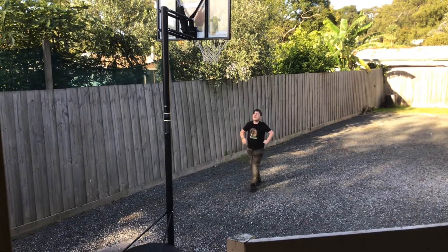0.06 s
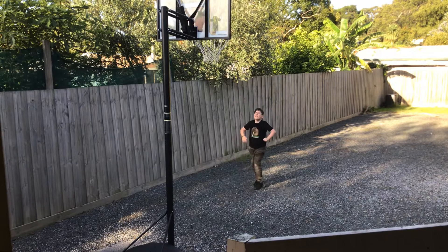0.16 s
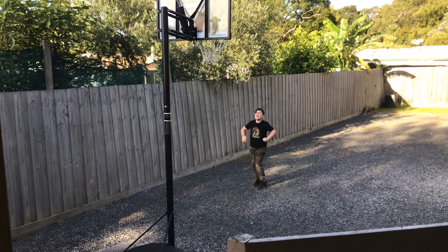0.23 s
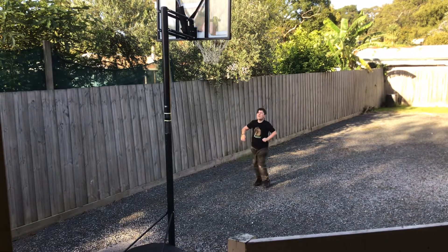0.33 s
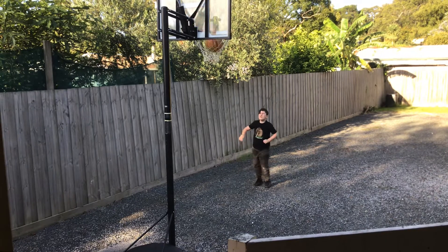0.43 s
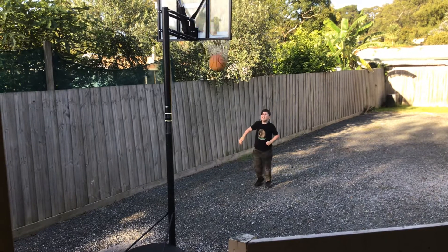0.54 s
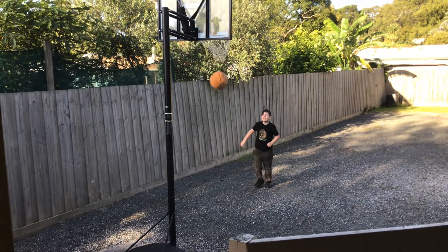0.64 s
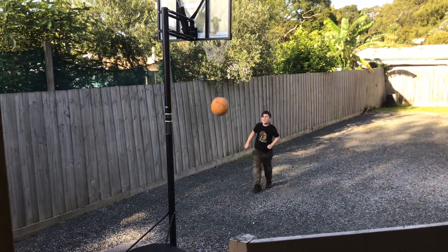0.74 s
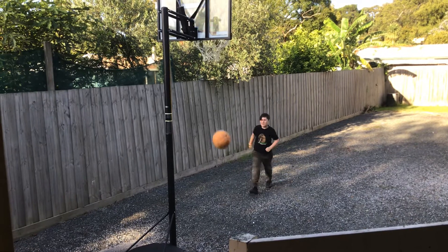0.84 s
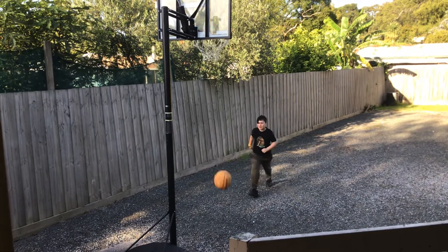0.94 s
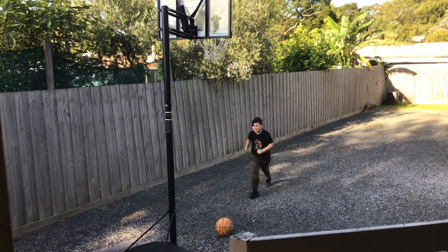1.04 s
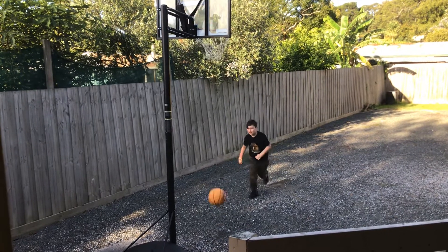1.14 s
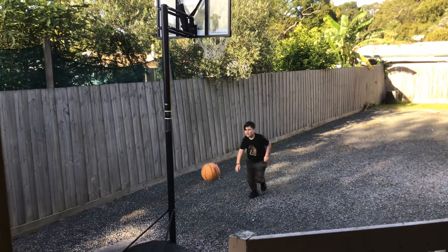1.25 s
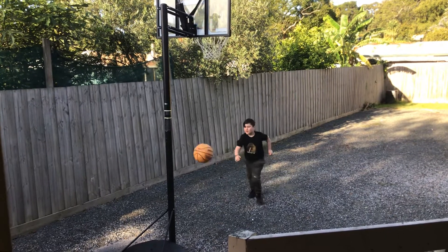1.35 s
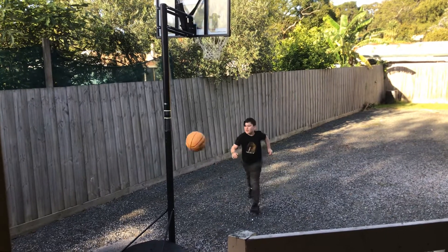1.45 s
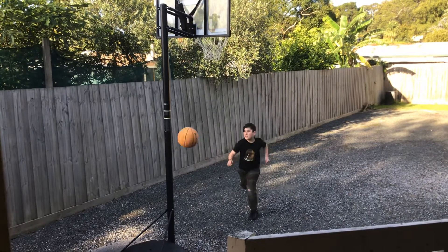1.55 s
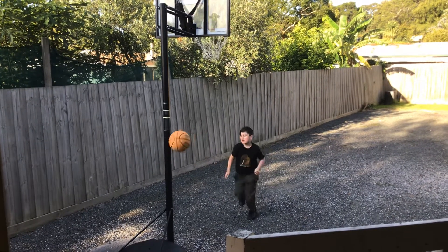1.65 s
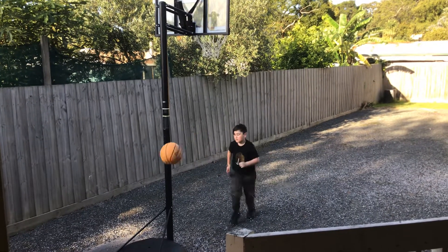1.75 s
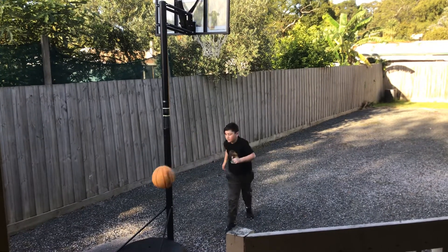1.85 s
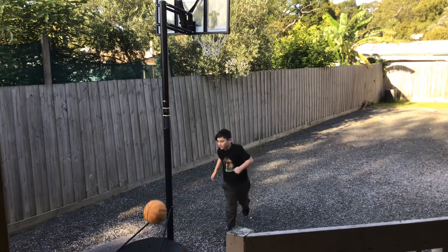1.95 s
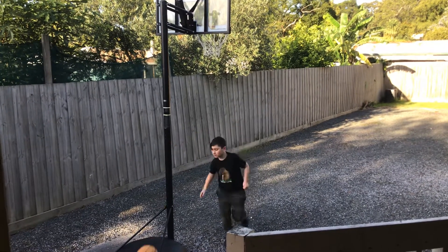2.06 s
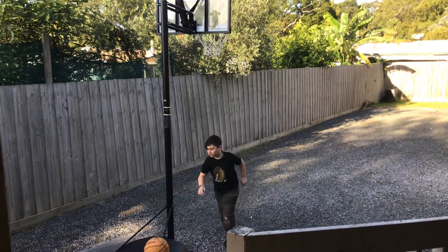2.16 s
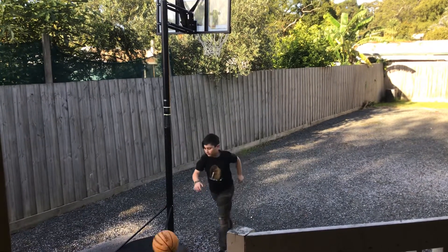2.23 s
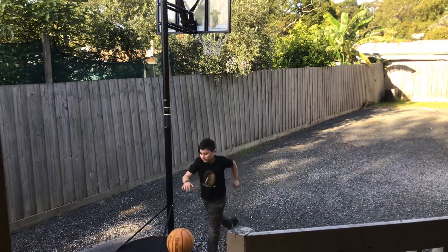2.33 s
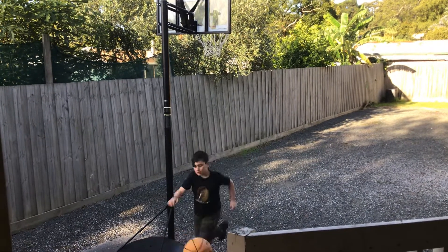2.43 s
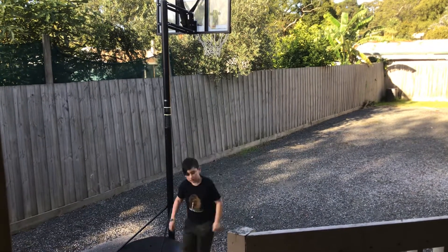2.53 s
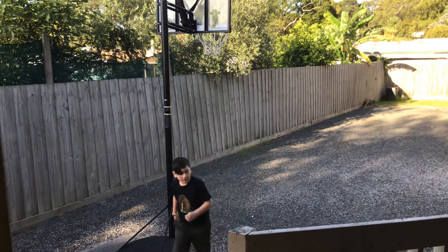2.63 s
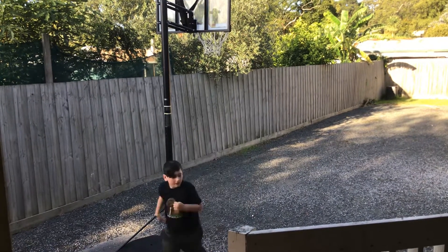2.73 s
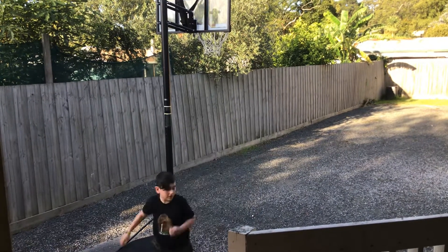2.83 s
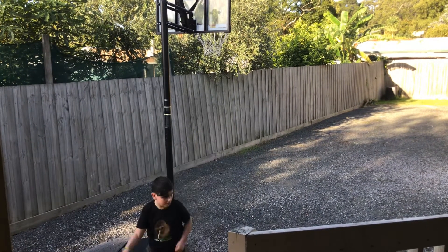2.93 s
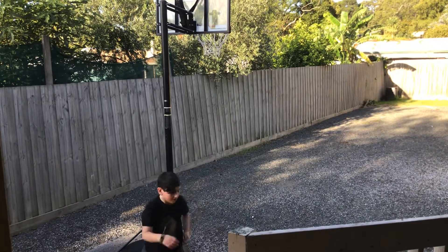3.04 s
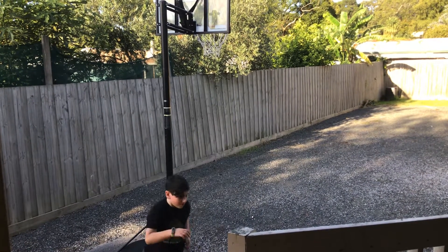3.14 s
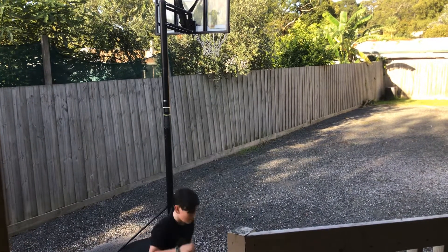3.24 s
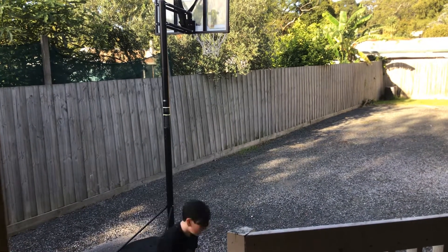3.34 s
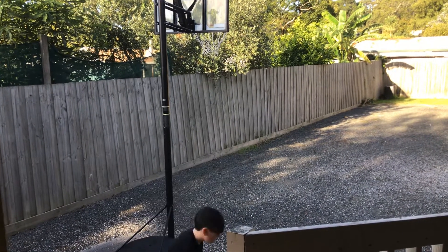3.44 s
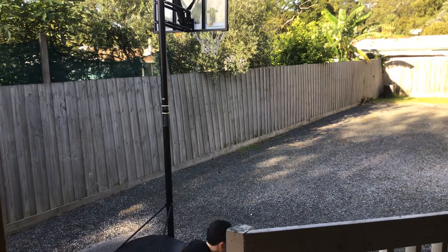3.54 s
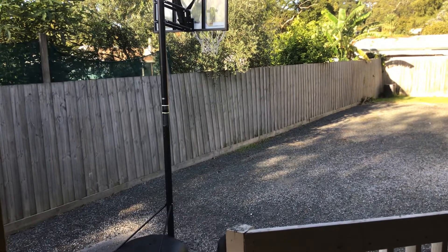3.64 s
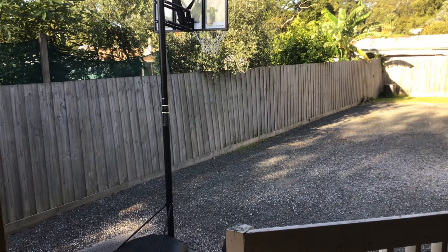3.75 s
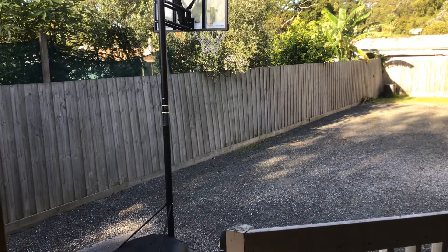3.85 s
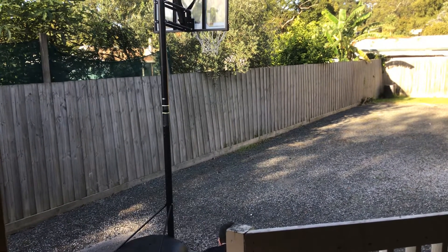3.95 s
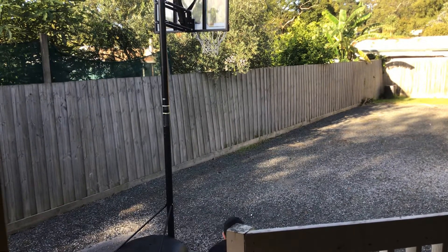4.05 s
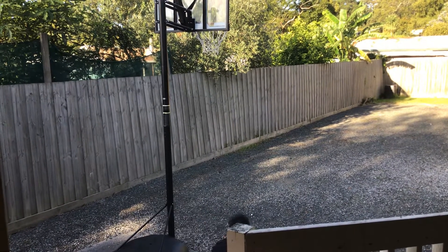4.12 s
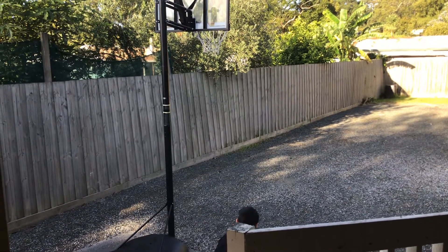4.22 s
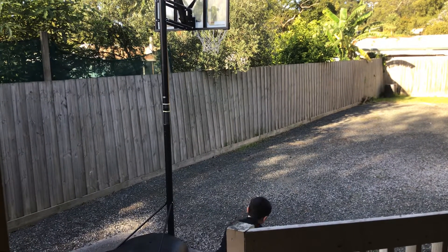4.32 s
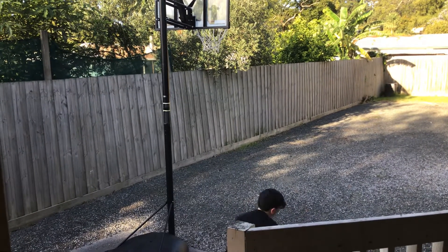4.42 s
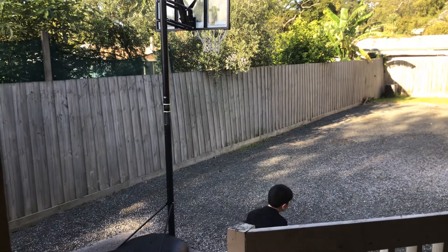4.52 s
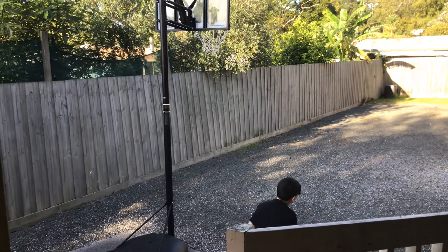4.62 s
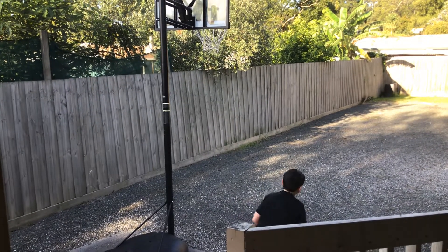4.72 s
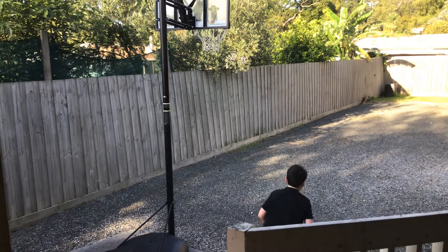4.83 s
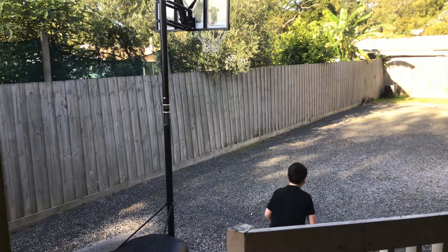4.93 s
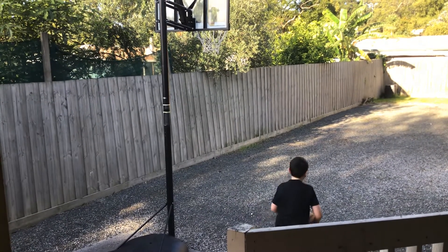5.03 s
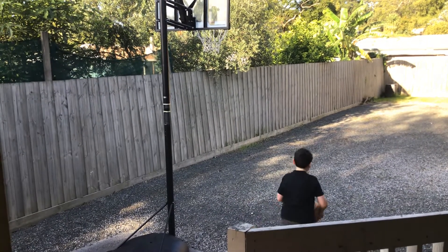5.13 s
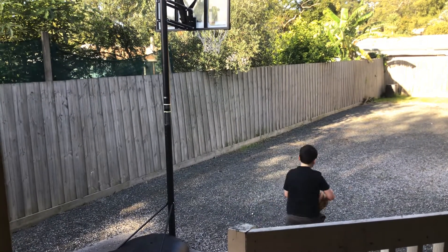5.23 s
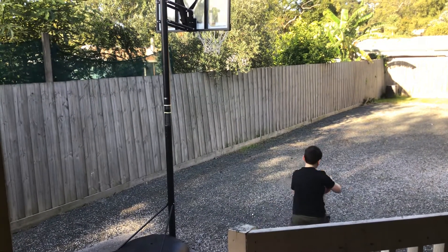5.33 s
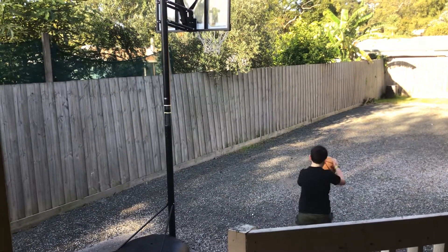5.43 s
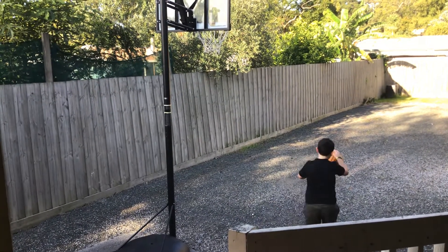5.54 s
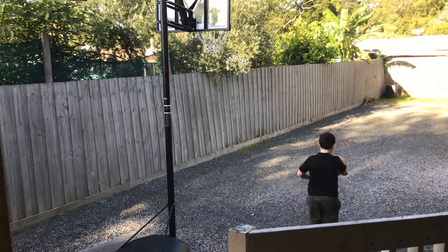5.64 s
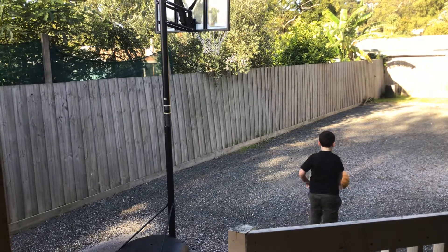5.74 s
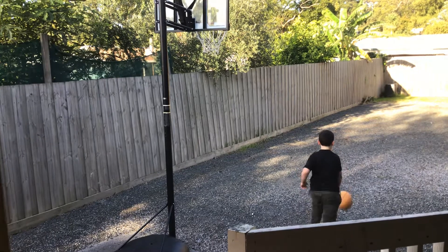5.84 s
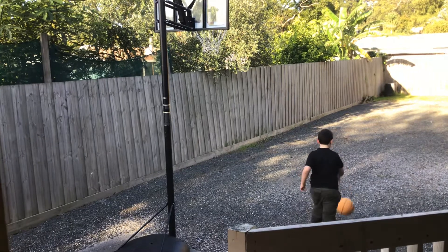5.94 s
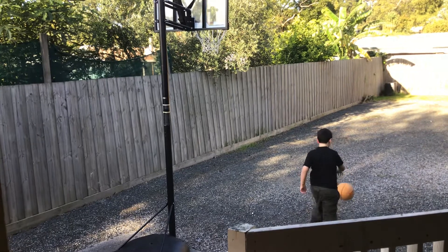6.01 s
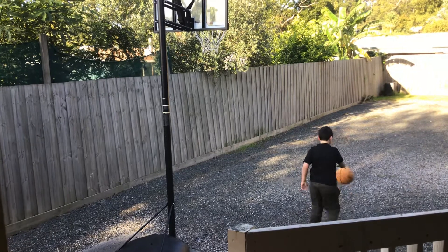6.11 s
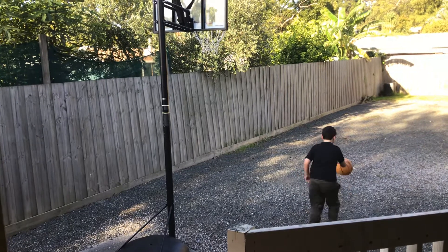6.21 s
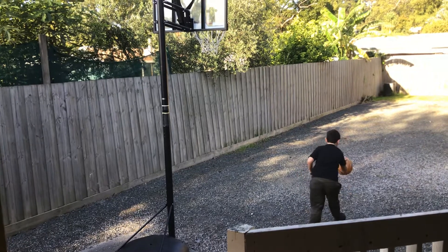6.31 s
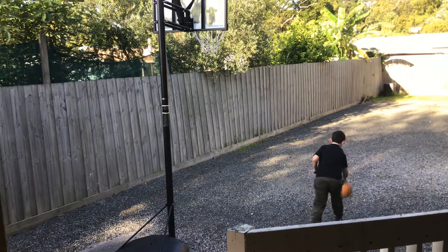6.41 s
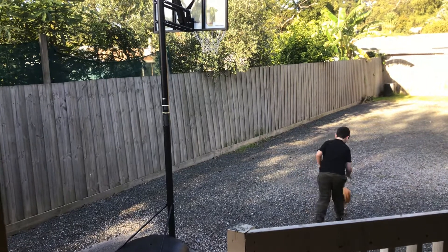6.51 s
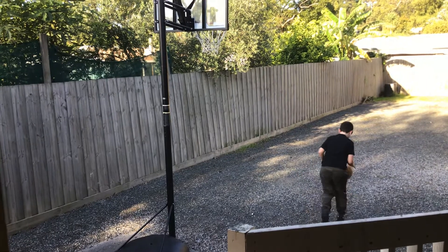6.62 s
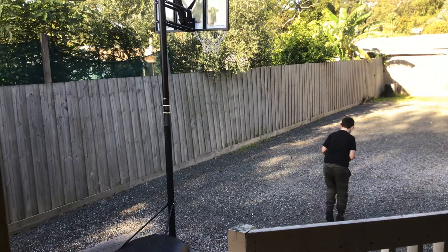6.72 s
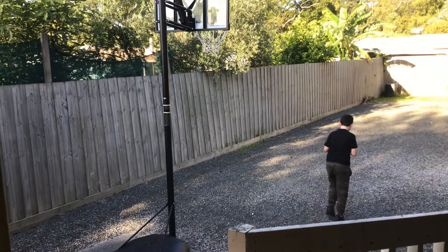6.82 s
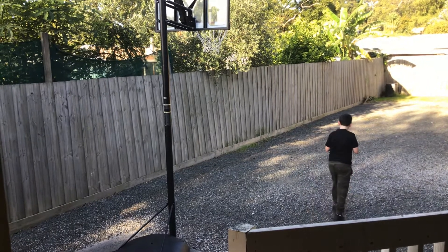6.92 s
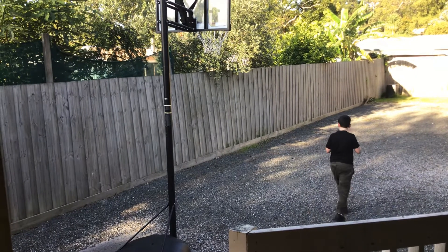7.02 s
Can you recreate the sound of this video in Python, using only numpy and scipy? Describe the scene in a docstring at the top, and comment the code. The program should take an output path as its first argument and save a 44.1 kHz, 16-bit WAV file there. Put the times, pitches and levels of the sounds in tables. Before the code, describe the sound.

A basketball hoop shudders and clanks as the ball swishes softly through the net. The ball lands on packed gravel with a loud, slapping thud and keeps bouncing, mixed with hollow knocks on a wooden step. Shoes crunch over the stones, then come two dribbles and a brief small rattle. The bounces echo lightly around a yard with a faint hush of distant traffic and leaves.

```python
"""A yard hoop shudders and its net swishes, then a basketball drops and bounces on packed gravel.
Each bounce is a slap and a thump, with the rubber and the air inside ringing. The ball knocks about a
wooden step and is dribbled away, while shoes crunch the stones and something small rattles at the end.
Fence and house echo each thud over a suburban hush of far traffic and leaves."""
import sys
import numpy as np
from scipy import signal
from scipy.fft import rfft, irfft, next_fast_len
from scipy.io import wavfile
from scipy.ndimage import uniform_filter1d

SR = 44100
rng = np.random.default_rng(int(sys.argv[2]) if len(sys.argv) > 2 else 0)


def generate_wav(sig):
    """Save sig (samples, or channels by samples) to the path in sys.argv[1] as 16-bit PCM at SR."""
    pcm = np.round(np.clip(np.atleast_2d(sig).T, -1, 1) * 32767).astype(np.int16)
    wavfile.write(sys.argv[1], SR, pcm)


N = 311787
T = np.arange(N) / SR


def undb(db):
    """Turns decibels into a gain."""
    return 10 ** (np.asarray(db) / 20)


def unit(x):
    """Scales x to an average (RMS) level of 1."""
    return x / np.sqrt(np.mean(x ** 2))


def peak(x, db):
    """Scales x so that its highest point is at db."""
    return undb(db) * x / np.max(np.abs(x))


def band(x, lo_hz, hi_hz):
    """Keeps the sound between two pitches."""
    edges = np.clip([lo_hz, hi_hz], 10, SR / 2.2)
    return signal.sosfilt(signal.butter(2, edges, "band", fs=SR, output="sos"), x)


def colour(x, points):
    """Shapes the tone of x along a curve of (Hz, dB) points."""
    size = next_fast_len(len(x))
    hz, db = np.transpose(points)
    f = np.maximum(np.arange(size // 2 + 1) * SR / size, 1)
    gain = undb(np.interp(np.log(f), np.log(hz), db))
    return irfft(rfft(x, size) * gain, size)[:len(x)]


def fade(t, t60):
    """Dies away by 60 dB in t60 seconds, the fade time."""
    return np.exp(-np.log(1000) * t / max(t60, .002))


def swell(start_s, rise_s, hold_s, t60):
    """A level that rises, holds and fades."""
    age = T - start_s
    return np.clip(age / max(rise_s, .001), 0, 1) * fade(np.maximum(age - rise_s - hold_s, 0), t60)


def ring(t, tones, scatter_db, tilt_db=0):
    """A struck object's fading tones; their levels and pitches vary a little with every blow."""
    chance = rng.standard_normal((len(tones), 2))
    return sum(undb(db + scatter_db * louder + tilt_db * np.log2(hz / tones[0][0])) * fade(t, t60)
               * np.sin(2 * np.pi * hz * (1 + 0.022 * sharper) * t)
               for (hz, db, t60), (louder, sharper) in zip(tones, chance))


def add(out, s, sound):
    """Mixes a sound into out, starting at s seconds."""
    i = int(s * SR)
    out[i:i + len(sound)] += sound[:N - i]


def walk(per_s):
    """Glides smoothly to a new random value per_s times a second."""
    hold = int(SR / per_s)
    steps = np.repeat(rng.standard_normal(N // hold + 1), hold)
    return uniform_filter1d(uniform_filter1d(steps, hold), hold)[:N]


def grains(per_s, spread_db, smear_s):
    """Random clicks of different sizes, each smeared into a short puff of noise."""
    clicks = (rng.random(N) < per_s / SR) * undb(spread_db * rng.exponential(size=N))
    decay = np.exp(-1 / (max(smear_s, 1e-4) * SR))
    return signal.lfilter([1], [1, -decay], clicks) * rng.standard_normal(N)


def hush():
    """Far traffic and leaves: octaves of noise that swell together and flicker alone."""
    # Each row: pitch in Hz, relative level of the noise in dB.
    tone_curve = [(18, -79), (30, -21), (79, 2.5), (103, -9), (170, -7), (303, -14.5), (415, -16),
                  (721, -15.5), (1130, -15), (3580, -31), (5740, -43.5), (16000, -47.5)]
    size = next_fast_len(N)
    spectrum = rfft(colour(rng.standard_normal(N), tone_curve), size)
    drift_db = 1.2 * walk(0.59)
    octave = np.log2(np.maximum(np.arange(len(spectrum)) * SR / size, 1) / 31)
    layers = (irfft(spectrum * np.clip(1 - abs(octave - k), 0, 1), size)[:N] for k in range(10))
    return unit(sum(layer * undb(drift_db + 0.23 * walk(3.4)) for layer in layers)) * undb(-51)


def yard(x):
    """The yard adds a tail of scattered echoes; its highs drift between two tails as a smooth wash."""
    # Each row: pitch in Hz, build-up in seconds, fade time in seconds, gain in dB.
    echo_bands = [(117, 0.025, 0.49, -47.5), (257, 0.019, 0.83, -45), (577, 0.0085, 0.32, -36.5),
                  (1550, 0.0028, 0.43, -37.5), (2930, 0.016, 0.74, -45.5), (7100, 0.006, 0.53, -39.5)]
    drift_above_hz = 420
    t = T[:int(.7 * SR)]

    def tail(rows):
        response = sum(undb(db) * band(rng.standard_normal(len(t)), hz / 1.74, hz * 1.69)
                       * fade(t, t60) * np.minimum(t / build_s, 1) ** 2 for hz, build_s, t60, db in rows)
        return signal.fftconvolve(x, response)[:N]
    low = [row for row in echo_bands if row[0] < drift_above_hz]
    high = [row for row in echo_bands if row[0] >= drift_above_hz]
    blend = 2 * np.pi * 1.218 * walk(70)
    return x + tail(low) + np.cos(blend) * tail(high) + np.sin(blend) * tail(high)


def chips():
    """Stray chips of gravel skip about with faint ticks."""
    return undb(-63.5) * band(grains(per_s=7, spread_db=2.5, smear_s=0.0013), 3100, 12500)


def small_rattle():
    """Something small and hard rattles: bursts of contact make it ring."""
    # Each row: start in seconds, peak level in dB.
    shakes = [(6.831, -39), (6.8856, -45), (6.927, -35.5), (6.9483, -42.5), (6.9788, -35), (7.0506, -41)]
    # Each row: pitch in Hz, relative level in dB, fade time in seconds.
    tones = [(1530, 3, 0.013), (1795, 1.5, 0.093), (2330, 6, 0.018), (2630, -4, 0.022), (3480, -1, .03),
             (3800, -3, 0.025), (4280, -8, 0.04)]
    out, t = np.zeros(N), T[:SR // 2]
    for s, db in shakes:
        contact = rng.standard_normal(len(t)) * fade(t, 0.14)
        ringing = signal.fftconvolve(contact, ring(t, tones, scatter_db=2.1))[:len(t)]
        add(out, s, peak(ringing, db))
    return out


def gravel(drive, hz, grit_db):
    """Pressed gravel: a crunch with a squeak in it, a low weight under it and fine grit over it."""
    crunch = unit(band(drive, hz / 1.7, hz * 1.7))
    squeak = undb(-9) * unit(band(drive, hz / 1.05, hz * 1.05))
    weight_db = 1.23 - 2.5 * np.log2(hz / 2000)  # finer stones carry less weight
    weight = undb(weight_db) * unit(band(drive, 426, 990))
    grit = undb(grit_db) * unit(band(drive, 5450, 13500))
    return crunch + squeak + weight + grit


def stone_snaps():
    """Lone stones snap underfoot, each a sudden short crunch."""
    # Each row: start in seconds, level in dB, pitch in Hz, grit in dB relative to the crunch.
    snaps = [(1.093, -33.5, 1760, -18), (1.5664, -42.5, 1510, -4), (1.7998, -34.5, 1780, -29),
             (1.9708, -50.5, 3440, -20), (2.4503, -39, 1710, -9.5), (2.8039, -46, 2970, -5),
             (2.826, -42, 2970, -16), (3.2978, -41, 1400, -25), (3.6221, -42, 1622, -4.5),
             (3.7544, -42, 1700, -2.5), (3.8122, -35, 2600, -6), (4.7147, -48.5, 3260, -9),
             (4.9519, -39, 4000, -4), (5.0195, -38, 2920, -9.5), (5.3012, -37.5, 1890, -18),
             (5.3552, -48.5, 4630, 1), (5.3762, -47.5, 5600, -2), (5.4311, -39.5, 5200, -15),
             (5.7898, -44, 3100, -28), (5.8805, -44.5, 2500, -13), (5.943, -43, 2930, -5),
             (6.3944, -40, 1440, -4)]
    out, t = np.zeros(N), T[:SR // 2]
    shape = np.minimum(t / 0.0034, 1) * fade(t, 0.063)
    for s, db, hz, grit_db in snaps:
        add(out, s, undb(db) * gravel(rng.standard_normal(len(t)), hz, grit_db) * shape)
    return out


def pebbles(hz, grit_db, length_s, per_s=150):
    """Pebbles turn and click under a sole, each with its own size and pitch; the finest sound as grit."""
    out, t = np.zeros(SR // 2), T[:SR // 20]
    for when, size, fine in rng.random((60, 3))[:int(per_s * length_s) + 1]:
        pitch = hz * 2 ** (1.124 * (3 * fine - 1))
        click = unit(band(rng.standard_normal(len(t)), pitch / 1.15, pitch * 1.15)) * fade(t, 0.028)
        size_db = -0.5 - 2.5 * np.log(1 - size)
        fine_db = np.interp(np.log(pitch), np.log([hz, 9000]), [0, grit_db])
        add(out, when * length_s, undb(size_db + fine_db) * click)
    return out


def shoes():
    """Soles bite into the gravel and grind it in lurches while pebbles click."""
    # Each row: start in seconds, level in dB, pitch in Hz, relative grit level in dB, hold in seconds.
    scuffs = [(0.563, -55.5, 2050, -8, 0.064), (0.959, -55, 1850, -10, 0.012),
              (1.06, -48, 1750, -16, 0.085), (1.294, -52.5, 2010, -9.5, 0.043),
              (1.464, -53.5, 2000, -11, 0.06), (1.583, -40.5, 1570, -11, 0.04),
              (1.839, -51, 2160, -19, 0.041), (2.4577, -44, 2087, -8, 0.014), (2.784, -59, 4530, 2, 0.031),
              (3.773, -46, 1750, -15, 0.023), (4.2145, -48, 1760, -13, 0.013),
              (4.62, -57.5, 3990, -12, 0.034), (4.958, -50, 3370, -8.5, 0.095),
              (5.41, -45.5, 4600, -12, 0.065), (5.503, -44, 4020, -7, 0.044), (5.607, -45, 3220, -3, 0.076),
              (5.771, -45.5, 3080, -8, 0.06), (5.884, -48, 2630, -10.5, 0.11), (6.4, -42, 1550, -12, 0.079),
              (6.488, -39.5, 1860, -15.5, 0.098), (6.89, -54, 1970, -16, 0.15)]
    rise_s, lurch_db, grind_db = 0.014, 5, -3.5
    out, length = np.zeros(N), SR // 2
    stream = grains(per_s=3000, spread_db=1.9, smear_s=0.0029) * undb(lurch_db * walk(60))
    for s, db, hz, grit_db, hold_s in scuffs:
        drive = np.roll(stream, -int(s * SR))[:length]
        pressure = swell(0, rise_s, hold_s, t60=0.096)[:length]
        add(out, s, undb(db) * pebbles(hz, grit_db, rise_s + hold_s))
        add(out, s, undb(db + grind_db) * gravel(drive, hz, grit_db) * pressure)
    return out


def net():
    """The ball brushes through the net with one high, fluttering swish."""
    brushing = grains(per_s=820, spread_db=1.3, smear_s=0.0088) * undb(2.0 * walk(57.5))
    shape = swell(start_s=0.026, rise_s=0.13, hold_s=0.16, t60=0.79)
    return unit(band(brushing, 9500, 20400)) * undb(-51.5) * shape


def hoop():
    """The ball jolts the hoop: the stand shudders and the rim clanks and rattles."""
    # Each row: start in seconds, then the levels of shudder, rattle and clank in dB.
    jolts = [(-0.05, -32, -42, -71), (0.225, -44.5, -50, -30.5)]
    # Each row, in both tables: ringing pitch in Hz, its width in Hz, relative level in dB.
    stand_tones = [(95, 17, -3), (142.9, 13, 0), (184.8, 18, -3), (244, 18.5, -4), (312, 106, -7.5)]
    rim_tones = [(589, 150, 6.5), (724, 126, 5), (832, 144, -1.5), (1080, 290, 0.5), (1710, 360, -2.5),
                 (3230, 1800, -4)]

    def vibrate(tones, drive):
        ringing = sum(undb(db) * unit(band(drive, hz - width / 2, hz + width / 2))
                      for hz, width, db in tones)
        return np.roll(unit(ringing), -SR)  # shifted so it already rings at the start
    stand = vibrate(stand_tones, rng.standard_normal(N))
    rim = vibrate(rim_tones, grains(per_s=770, spread_db=0.83, smear_s=0.019))
    shudder = sum(undb(db) * swell(s, 0, 0, t60=2.57) for s, db, _, _ in jolts)
    rattle = sum(undb(db) * swell(s, 0, 0, t60=2.27) for s, _, db, _ in jolts)
    clank = sum(undb(db) * swell(s, 0.015, 0, t60=0.28) for s, _, _, db in jolts)
    return stand * shudder + rim * (rattle + clank)


def wooden_step():
    """Ball and shoes knock on boards: a short rattle of contact rings the wood, with a dry tick."""
    # Each row: start in seconds, peak in dB, rattle fade in seconds, hardness as dB added per octave.
    knocks = [(2.054, -28, 0.016, 19), (2.198, -20, 0.42, 2.5), (2.486, -35.5, 0.07, -8),
              (3.031, -27, 0.13, 18), (3.052, -17, 0.048, -4), (3.103, -22, 0.06, -14),
              (3.5, -25, 0.083, 1), (3.629, -39, 0.034, 22), (3.8, -31, 0.12, 9), (3.825, -27.5, 0.05, 3),
              (4.194, -30.5, 0.24, 14), (4.229, -35.5, 0.097, 14)]
    # Each row: pitch in Hz, relative level in dB, fade time in seconds.
    board_tones = [(113.4, 0, 0.23), (153, -0.5, 0.11), (217, 0, 0.076), (297, -1.5, 0.085),
                   (396, 2.5, 0.021), (466.3, -7, 0.16)]
    out, t = np.zeros(N), T[:SR // 2]
    for s, db, rattle_s, hardness in knocks:
        contact = rng.standard_normal(len(t)) * fade(t, rattle_s) * np.minimum(t / 0.0067, 1)
        wood = signal.fftconvolve(contact, ring(t, board_tones, 1.5, hardness))[:len(t)]
        tick = band(rng.standard_normal(len(t)), 370, 2230) * fade(t, .12) * np.minimum(t / 0.0027, 1)
        tick_db = db - 16.5 + 0.88 * hardness  # harder knocks tick louder
        add(out, s, peak(wood, db) + peak(tick, tick_db))
    return out


def ball():
    """Each bounce slaps the skin, thumps the ground, rings rubber and air and sprays grit; walls echo."""
    # Each row: start in seconds; peaks of slap, thump, rubber, air and grit in dB; thump and grit pitch
    # in Hz; brightness of slap and rubber in dB per octave; echo delay in seconds; echo gain in dB.
    bounces = [(1.155, -9, -7, -15, -37, -32, 114, 9600, 3, 0, 0.11, -27),
               (2.164, -18, -13.5, -23, -40, -24, 111, 5840, 9.4, -6, 0.14, -22.5),
               (2.8588, -15, -15.5, -19, -36, -41, 117, 5900, 3.6, -15, 0.11, -17),
               (3.483, -12.5, -17, -14.5, -39, -40.5, 152, 5530, 3.4, -23, 0.11, -19),
               (3.9455, -15.5, -16, -22.5, -29, -37.5, 121, 6120, 6.7, -8.5, 0.13, -28),
               (6.0206, -13.5, -15.5, -24, -21.5, -30, 115, 11300, 3.1, 5, .1, -20.5),
               (6.5787, -11, -11, -26.5, -20.5, -29.5, 111, 11300, 2, -9, 0.098, -21)]
    # The rubber wall and the air inside. Each row: pitch in Hz, relative level in dB, fade in seconds.
    rubber_tones = [(218.8, 2.5, 0.076), (330, -0.5, 0.11), (465.7, 2.5, 0.21), (586, -0.5, 0.24)]
    air_tones = [(888, 11.5, 0.034), (1530, -10, 0.34), (1407, -22, 0.34), (2010, -26.5, 0.066),
                 (2353, -0.5, 0.0073), (2760, -48, 0.023), (3240, -25, 0.013), (3830, -18.5, 0.015)]
    # The tone of the skin's slap. Each row: pitch in Hz, relative level in dB.
    slap_curve = [(300, 7.5), (900, 4.5), (2300, -7.5), (4100, -17), (5500, -30), (7200, -57),
                  (16000, -142)]
    far_wall_s, far_wall_db = 0.036, -2  # a second boom follows from further off
    out, t = np.zeros(N), T[:SR // 2]
    stream = grains(per_s=1430, spread_db=3.0, smear_s=0.0025)
    squash = np.minimum(t / 0.0023, 1)  # the ball takes a moment to flatten on the ground
    for (s, slap_db, thump_db, rubber_db, air_db, grit_db,
         thump_hz, grit_hz, slap_tilt, rubber_tilt, echo_s, echo_db) in bounces:
        noise = rng.standard_normal(len(t))
        skin = [(hz, db + slap_tilt * np.log2(hz)) for hz, db in slap_curve]
        slap = colour(noise, skin) * squash * (fade(t, .022) + undb(-5) * fade(t, .11))
        spray = band(np.roll(stream, -int(s * SR))[:len(t)], grit_hz / 1.3, grit_hz * 2.3)
        grit = spray * squash * (fade(t, 0.019) + undb(-6.5) * fade(t, 0.14))
        # so small a source gives off little below its own pitch
        thump = band(np.sin(2 * np.pi * thump_hz * t) * fade(t, 0.057), 74, 730)
        rubber = ring(t, rubber_tones, scatter_db=0.49, tilt_db=rubber_tilt)
        air = squash * ring(t, air_tones, scatter_db=2.1, tilt_db=-3.7)
        add(out, s, peak(slap, slap_db) + peak(grit, grit_db) + peak(thump, thump_db))
        add(out, s, peak(rubber, rubber_db) + peak(air, air_db))
        clack = band(noise, 1160, 1620) * squash * fade(t, 0.041)  # the slap's echo
        add(out, s + echo_s, peak(clack, slap_db + echo_db) + peak(thump, thump_db + echo_db))
        add(out, s + echo_s + far_wall_s, peak(thump, thump_db + echo_db + far_wall_db))
    return out


def scene():
    """Sounds on the ground echo round the yard; net, hoop and hush join them in one channel."""
    ground = ball() + wooden_step() + shoes() + stone_snaps() + small_rattle() + chips()
    return (yard(ground) + net() + hoop() + hush())[None]


def record(dry):
    """The low notes come slightly late; the deepest bass and the highest treble are cut."""
    # Filters that only delay the lows. Each row: corner pitch in Hz, number of stages.
    bass_lag = [(120, 6.25), (500, 7.53), (2000, 2.2)]
    low_cut_hz, high_cut_hz = 64, 15900
    lead = SR // 8  # a mirrored lead-in, so sound is already going at the start
    size = next_fast_len(N + 2 * lead)
    f = np.arange(size // 2 + 1) * SR / size
    phase = sum(-2 * stages * np.arctan(f / hz) for hz, stages in bass_lag)
    padded = np.pad(dry, ((0, 0), (lead, 0)), "reflect")
    late = irfft(rfft(padded, size) * np.exp(1j * phase), size)
    low_cut = signal.butter(4, low_cut_hz, "high", fs=SR, output="sos")
    high_cut = signal.ellip(10, .2, 70, high_cut_hz, fs=SR, output="sos")
    return signal.sosfilt(high_cut, signal.sosfilt(low_cut, late))[:, lead:lead + N]


dry = scene()
out = record(dry)
generate_wav(out)
```